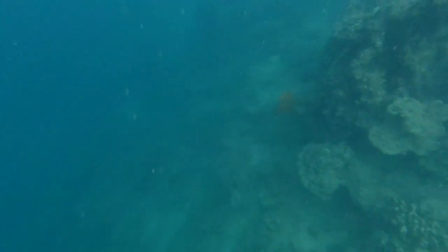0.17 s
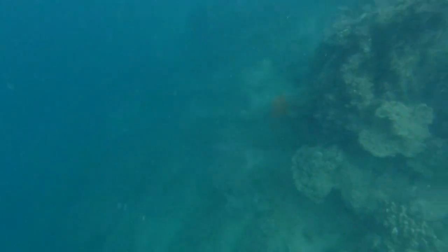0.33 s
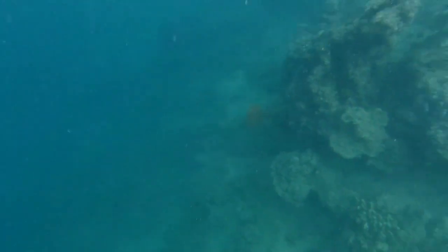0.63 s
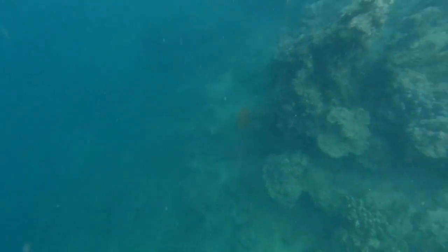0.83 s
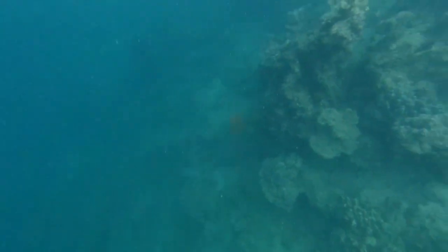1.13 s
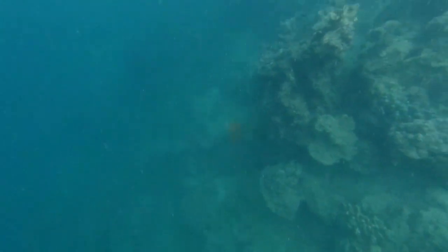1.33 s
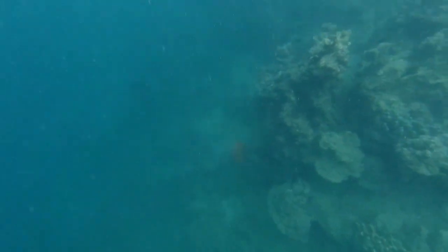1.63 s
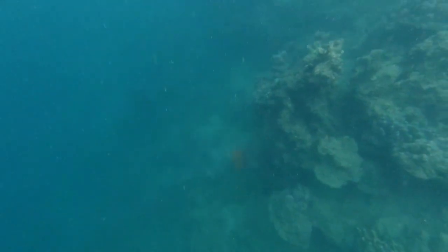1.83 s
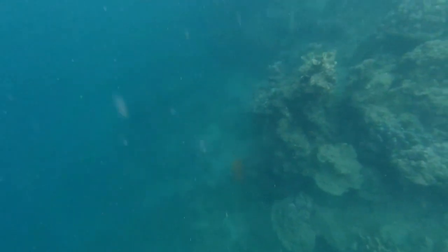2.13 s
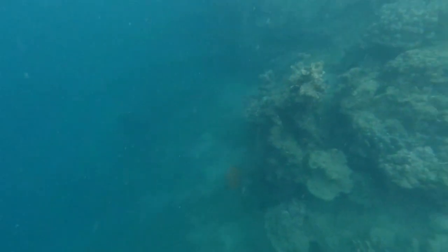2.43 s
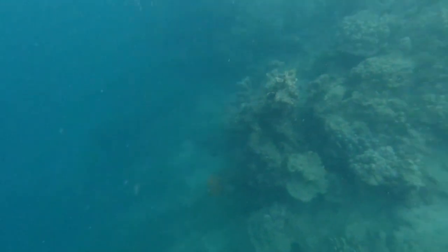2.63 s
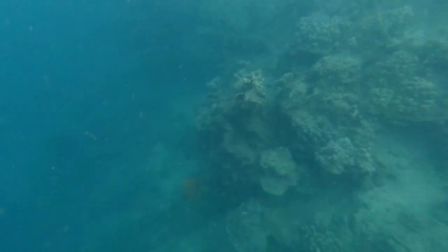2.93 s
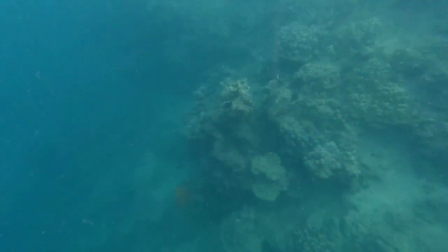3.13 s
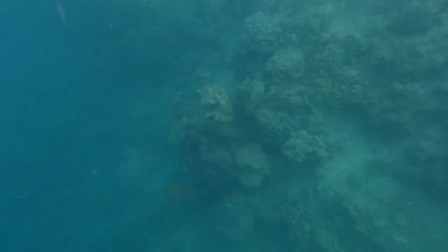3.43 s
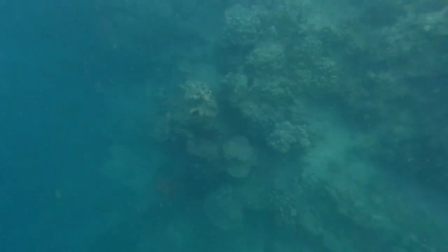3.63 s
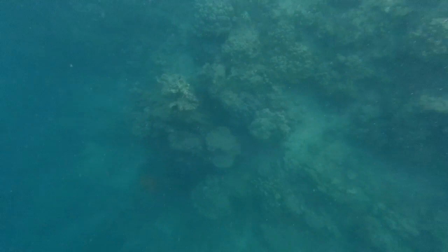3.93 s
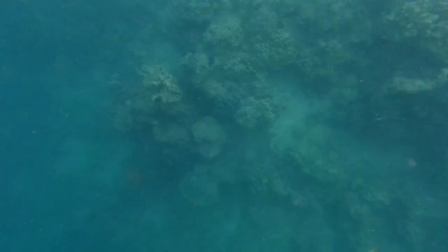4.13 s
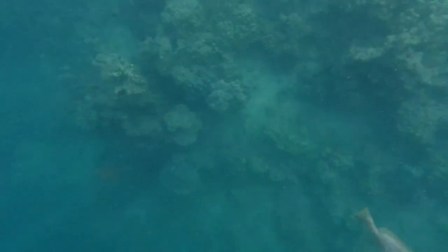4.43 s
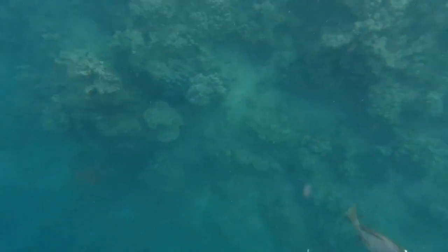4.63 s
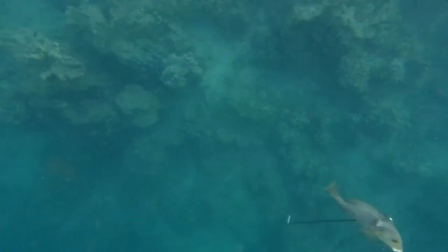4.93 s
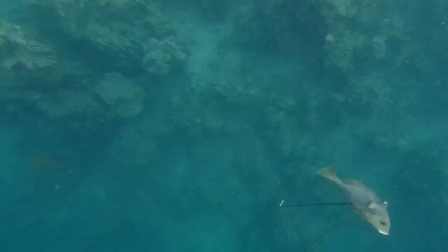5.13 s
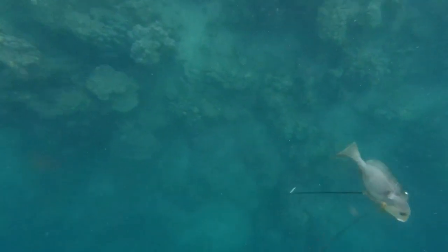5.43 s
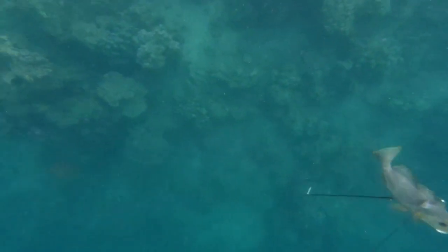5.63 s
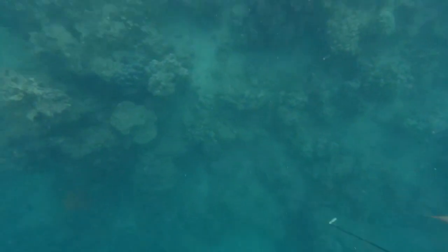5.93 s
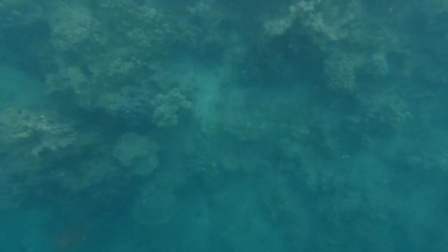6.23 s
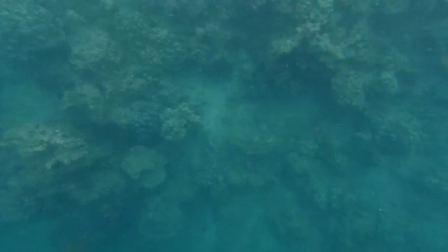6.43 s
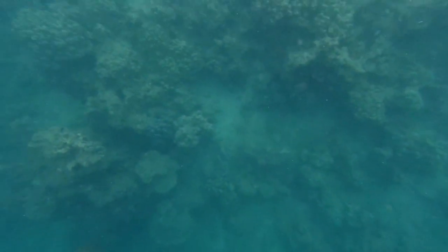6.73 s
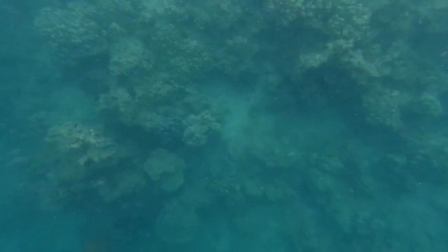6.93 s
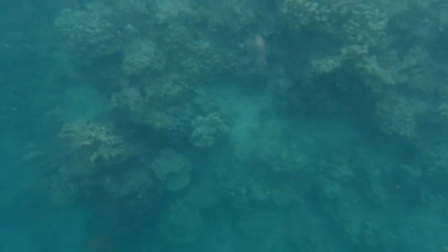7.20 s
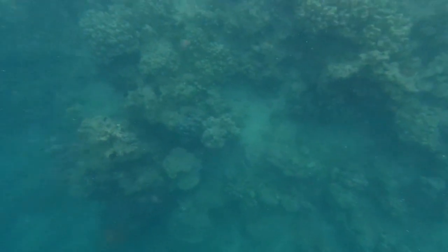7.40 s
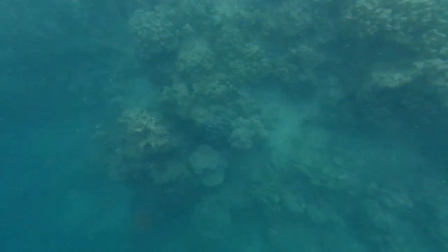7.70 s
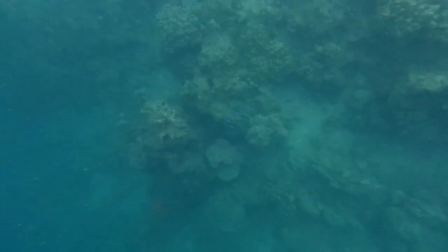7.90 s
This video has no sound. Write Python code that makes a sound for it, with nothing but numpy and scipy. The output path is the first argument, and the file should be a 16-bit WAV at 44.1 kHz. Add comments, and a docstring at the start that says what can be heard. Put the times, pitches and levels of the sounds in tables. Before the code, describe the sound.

Underwater over a reef, heard from inside a sealed camera housing. Snapping shrimp crackle throughout, dry irregular clicks over a fine distant bed. Low water pressure heaves and rubs past as the diver moves, with soft bassy thumps and hollow knocks of the mount. The strongest bump and rattle comes just before seven seconds, then a very short falling rubbery groan near the end.

```python
"""Over a reef, a camera in a sealed housing drifts along with a diver.
Snapping shrimp crackle all around as shaped noise bursts coloured by the housing's resonances.
Water heaves, rubs and hisses as coloured noise; jolts of the mount swing two decaying sines.
Small parts knock as short chatters and noise puffs, and near the end something rubbery judders
once in a short falling groan of wavering overtones."""
import sys
import numpy as np
from scipy.fft import rfft, irfft, next_fast_len
from scipy.io import wavfile
from scipy.ndimage import map_coordinates

SR = 44100
rng = np.random.default_rng(int(sys.argv[2]) if len(sys.argv) > 2 else 0)


def put_to_file(sound):
    """Save the sound as 16-bit audio at rate SR, in the file named by the first command-line argument."""
    columns = np.atleast_2d(sound).T  # one column per channel
    safe = np.clip(columns, -1, 1)
    whole_steps = np.round(safe * 32767)
    wavfile.write(sys.argv[1], SR, whole_steps.astype(np.int16))


N = 355446  # length in samples

# Near shrimp. Each row: time in seconds, peak in dB of the low ring, of the middle ring, of the treble spit.
NEAR_SNAPS = [(0.057, -38, -35, -48), (0.0963, -52, -51, -31), (0.13, -28.5, -35, -56),
              (0.157, -43, -37, -34), (0.2438, -31, -35, -28), (0.255, -29, -38, -31),
              (0.322, -17, -28.5, -24.5), (0.401, -25, -33, -27), (0.42, -24, -26.5, -28.5),
              (0.461, -30.5, -42, -37), (0.546, -26, -33.5, -34), (0.88, -29, -45, -34),
              (1.0013, -21, -29.5, -33), (1.134, -29.5, -50, -51), (1.256, -29, -53, -52),
              (1.316, -30.5, -32.5, -35), (1.4345, -32, -43, -43), (1.6047, -55, -38, -34),
              (1.802, -37, -49, -31), (1.8123, -22.5, -31.5, -39), (1.869, -35, -35, -34),
              (1.894, -27, -32.5, -32.5), (1.9638, -26, -39, -41), (1.986, -30, -29, -27.5),
              (2.026, -47, -40, -34), (2.056, -30, -28, -27.5), (2.187, -57, -45, -31),
              (2.3966, -30, -32, -35), (2.7016, -28, -30, -31), (2.775, -28.5, -30, -34),
              (2.7823, -22, -31, -32), (2.807, -30.5, -36, -35), (2.9226, -28, -58, -59),
              (2.961, -28, -31, -36), (3.013, -30.5, -45, -36), (3.0573, -25.5, -50, -36),
              (3.0953, -35, -41, -45), (3.1111, -23, -35, -41), (3.118, -22, -34.5, -42),
              (3.2039, -24.5, -37, -25), (3.26, -35, -33.5, -48), (3.368, -28.5, -24, -26.5),
              (3.425, -31.5, -43, -57), (3.675, -31, -32.5, -49), (3.6911, -23, -34, -38),
              (3.721, -31, -40, -45), (3.76, -23.5, -32, -26.5), (3.79, -30.5, -46, -51),
              (3.831, -29, -34, -37), (3.87, -26.5, -56, -36), (3.933, -50, -59, -31.5),
              (3.976, -32, -31, -42), (4.0647, -39, -35.5, -31.5), (4.152, -27, -32.5, -43),
              (4.231, -31, -54, -46), (4.2867, -40, -30, -35), (4.301, -31, -35, -23.5),
              (4.3659, -36, -35, -34), (4.394, -49, -29, -38), (4.483, -31.5, -31, -42),
              (4.4911, -32, -35, -27.5), (4.502, -33, -33, -33), (4.6573, -24.5, -43, -46),
              (4.9168, -23, -29.5, -38), (5.0323, -32.5, -33, -30), (5.0692, -16.5, -35, -29.5),
              (5.25, -22, -29, -33), (5.3118, -28.5, -34, -33), (5.3193, -28, -39, -39),
              (5.512, -30.5, -34, -39), (5.521, -34, -29, -28), (5.6173, -25.5, -55, -40),
              (5.7082, -30, -32.5, -56), (6.015, -90, -49, -29.5), (6.036, -21.5, -29, -35),
              (6.045, -28, -31, -34), (6.185, -30.5, -35.5, -36), (6.3834, -35, -23, -29),
              (6.397, -39, -38, -28.5), (6.64, -30.5, -32.5, -31.5), (6.764, -34, -34, -34),
              (6.812, -25, -30, -54), (6.829, -34, -30, -24.5), (6.841, -31, -38, -34),
              (6.885, -37, -37, -36), (6.962, -41, -42, -52), (7.0131, -33, -33, -48),
              (7.078, -30.5, -55, -42), (7.119, -33, -51, -37), (7.18, -32, -51, -38),
              (7.282, -38, -44, -54), (7.389, -29.5, -30.5, -31), (7.982, -28, -36, -50)]
# Far shrimp bed. Each row: time in seconds, level in dB.
FAR_CRACKLE = [(0, -48), (1.7, -51), (2.0, -45), (2.25, -52.5), (2.8, -48.5), (4.4, -52), (6.04, -49.5),
               (6.3, -57.5), (6.42, -49.5), (7.85, -50), (8.06, -49.5)]
# Resonances of the housing. Each row: centre in Hz, width in Hz, level in dB.
SHELL_RESONANCES = [(1420, 550, -10), (1850, 354, -4), (2697, 600, -6), (4020, 880, -7.5),
                    (6290, 1150, -9.5), (8780, 2000, -14.5), (12400, 1200, -19), (14600, 1600, -16)]
# Jolts of the mount. Each row: time in seconds, strength in dB.
MOUNT_JOLTS = [(0.178, -21), (0.24, -21), (0.327, -20), (0.528, -29), (0.847, -27), (0.902, -24.5),
               (1.23, -20.5), (1.301, -21.5), (1.729, -26), (1.912, -34), (3.701, -29), (3.754, -22.5),
               (3.86, -27), (4.08, -26), (4.178, -30.5), (4.25, -24.5), (4.351, -25), (4.495, -32),
               (5.015, -30), (5.455, -27), (5.657, -24.5), (6.112, -25), (6.451, -24), (6.6, -26),
               (6.818, -16.5), (6.86, -24), (7.009, -15), (7.081, -25), (7.39, -29), (7.528, -24),
               (7.59, -20), (7.689, -21)]
# Wobble, then slow swing of the mount. Each row: pitch in Hz, 60 dB decay in seconds, level in dB over the jolt.
MOUNT_MODES = [(80.7, 0.19, 3.5), (33.7, 0.25, -4.5)]
# Loose parts. Each row: time in seconds, strength in dB, centre in Hz, upper ring in dB over the strength.
PART_KNOCKS = [(0.302, -29.5, 380, -11), (0.48, -40, 510, -25), (0.726, -42.5, 408, -5),
               (1.131, -36.5, 510, -11), (1.486, -41, 680, -11), (1.598, -38, 490, -31),
               (1.756, -40.5, 620, -3), (2.602, -32, 720, -29), (3.114, -35, 685, -21),
               (4.126, -42, 670, -4), (4.366, -26.5, 745, -1.5), (4.582, -42.5, 636, 5),
               (6.454, -34.5, 594, -22), (6.492, -33, 500, -32), (6.8095, -25, 630, -7.5),
               (6.825, -27, 616, -5), (6.938, -22, 636, -5.5), (6.999, -39, 604, -6), (7.012, -28, 654, -4),
               (7.034, -31, 530, -16), (7.719, -38, 523, -24), (7.862, -38, 516, -19)]
# Low slaps of water on the wall. Each row: start in seconds, peak in dB.
WATER_THUDS = [(1.425, -44), (1.594, -46), (2.078, -42), (2.115, -43), (2.39, -43.5), (2.449, -39.5),
               (2.548, -43), (3.017, -42.5), (3.103, -41), (3.313, -44), (3.64, -44), (4.04, -41),
               (4.491, -43), (4.721, -41), (4.804, -40), (5.828, -46), (6.159, -34.5), (6.38, -39),
               (6.911, -45), (7.405, -34), (7.804, -37.5)]
# Groan. Each entry: mean level in dB of one multiple of the pitch, from the first up.
GROAN_OVERTONES = [8, -6.5, -16, -28, -32]
# The diver moves and water rubs past. Each row: time of full flow in seconds, hold in seconds, flow level in dB.
DIVER_MOVES = [(0.123, 0.45, -61.5), (0.629, 0.37, -55.5), (1.725, 0.38, -63), (3.682, 0.19, -54.5),
               (4.093, 0.35, -55), (5.183, 0.516, -52), (6.453, 0.26, -56.5), (6.752, 0.36, -51),
               (7.388, 0.37, -59.5)]
# Slow pressure heave. Each row: time in seconds, level in dB.
HEAVE_LEVEL = [(0, -37.5), (.3, -31.5), (1.64, -41), (2.2, -39.5), (3.55, -37.5), (3.88, -24), (4.0, -31.5),
               (4.5, -29), (5.52, -27), (6.33, -43), (6.84, -20.5), (7.05, -32), (7.25, -35), (8.06, -32)]
# Colour of the heave. Each row: frequency in Hz, relative level in dB per Hz.
HEAVE_COLOUR = [(4, -14), (12, -5.5), (24, -10), (36, -11.5), (55, -31), (75, -26), (110, -39), (160, -120)]
# Colour of the rub along the housing. Each row: frequency in Hz, relative level in dB per Hz.
RUB_COLOUR = [(82, -83), (140, 4), (193, 2), (284, -13), (355, -2), (502, -13), (656, 0.5), (1100, -25.5),
              (1430, -55), (2420, -120)]
# Colour of the steady sea noise outside the housing. Each row: frequency in Hz, relative level in dB per Hz.
HISS_COLOUR = [(90, -37), (140, -13), (300, -10), (600, 0.5), (1000, 2), (1500, 5), (4000, -1), (16000, 10)]

RIPPLE_DB = 1.5  # each snap comes by its own paths, which dent its colour
TREBLE_LAG_S = .001  # the bubble swells first, then collapses with the spit
CLUSTER_DB, CLUSTER_RATE = 3, 12  # the colony swells and thins: typical depth, changes a second
# The knock that a jolt shakes loose: mean level over the jolt, middle pitch, upper ring, delay
RATTLE_DB, RATTLE_HZ, RATTLE_RING_DB, RATTLE_LAG_S = -17.5, 630, -5.5, 0.00512
KNOCK_CYCLES, KNOCK_PUFF_DB = 6.5, -10  # chatter length; noise puff over the knock's strength
THUD_HZ, THUD_T60_S = 182, 0.0087
GROAN_S, GROAN_GAIN_DB = 7.612, -21  # start; gain over the overtones
GROAN_FROM_HZ, GROAN_TO_HZ, GROAN_SAG_S = 265, 105.2, .02  # the pitch sags from one towards the other
GROAN_RISE_S, GROAN_HOLD_S, GROAN_FALL_S = 0.029, 0.0365, 0.013
GROAN_BODY_HZ, GROAN_BODY_DB = 304, 5.5  # a resonance that lifts the overtones near it
GROAN_SLIP = 20  # slip of each overtone against the one below (radians a second)
MOVE_RISE_S, MOVE_FALL_S, STILL_DB = 0.013, 0.041, -72.5  # flow swells and dies; rub between moves
SWAY_DB, SWAY_STILL_DB = 10, -51.5  # wobble of the mount over the flow; wobble between moves
TICK_DB, TICK_HZ, TICK_T60_S = -1, 487, 0.012  # ticks the flow shakes loose: level over it, middle pitch
DRIFT_DB, DRIFT_HZ = -38, 10.5  # very slow pressure drift that never rests: level, upper edge
HISS_DB = -60
CEILING, TOP_HZ = .52, 15900  # largest swing kept; band limit of the camera


def shrimp(count=2400):
    """Near snaps stand out; many far ones crackle behind them at scattered sizes and colours."""
    when, size, low, middle, treble = rng.random((count, 5)).T
    size_db = -4.2 * np.log(1 - .985 * size)  # mostly small, a few large
    far = snaps(when * (N - 1) / SR, size_db + 17 * low, size_db - 3.5 + 18 * middle,
                size_db + 0.5 + 18 * treble)
    clustered = unit(far * amp(CLUSTER_DB * wobble(CLUSTER_RATE)))
    s, *levels_db = np.transpose(NEAR_SNAPS)
    near = snaps(s - .0012, *levels_db)
    return near + amp(curves(FAR_CRACKLE)[0]) * clustered


def snaps(s, low_db, middle_db, treble_db, size=1024):
    """A collapsing claw bubble thuds, rings the housing's resonances and spits treble of changing colour."""
    hz = np.fft.rfftfreq(size, 1 / SR)
    spread = rng.random((len(s), 7)).T
    path_s = 0.000288 + 0.001222 * spread[4][:, None]
    ripple = RIPPLE_DB * np.cos(2 * np.pi * (hz * path_s + spread[5][:, None]))
    colour = shell(hz) + ripple
    stretch = .5 * 3.56 ** spread[6][:, None]  # some snaps die faster than others

    def part(centre_hz, octaves, t60, peak_db, tail_db):
        return bursts(colour + bump(hz, centre_hz, octaves), t60 * stretch, peak_db,
                      size=size, tail_db=tail_db)

    thud = part(450 * 2.26 ** spread[0], 0.51, 0.0072, low_db - 21.5 + 9 * spread[1], -11.5)
    low = part(1760 * 1.138 ** spread[1], 0.41, 0.0038, low_db, -25.5)
    middle = part(2500 * 1.574 ** spread[2], 0.49, 0.006, middle_db, -18)
    treble = part(5500 * 2.87 ** spread[3], 0.83, 0.0037, treble_db, -25)
    return place(thud + low, s) + place(middle + treble, s + TREBLE_LAG_S)


def shell(hz):
    """Level in dB the housing passes: resonances over a stiff wall, a notch, and a leak in the bass."""
    power = sum(amp(2 * db) / (1 + (2 * (hz - centre) / width) ** 2) ** 1.37
                for centre, width, db in SHELL_RESONANCES)
    notch = 1 - 0.97 / (1 + ((hz - 1680) / 60) ** 2)
    stiff_wall = 1 / (1 + (1300 / (hz + 1)) ** 6)
    bass_leak = amp(-14.5) / (1 + (hz / 800) ** 8)
    return 10 * np.log10(power * notch * stiff_wall + bass_leak)


def jolts():
    """Each jolt starts the wobble and the slow swing, in opposite directions, through a soft contact."""
    s, db = np.transpose(MOUNT_JOLTS)
    t = np.arange(SR // 3) / SR
    contact = (1 - np.exp(-t / 0.0043)) ** 2
    rows = 0
    for k, (hz, t60, mode_db) in enumerate(MOUNT_MODES):
        # The slow swing scatters more in pitch than the wobble
        pitch = hz * (1 + .03 * (1 + 3 * k) * rng.standard_normal((len(s), 1)))
        decay = amp(db[:, None] + mode_db - 60 * t / t60)
        rows = rows + (-1) ** k * decay * np.sin(2 * np.pi * pitch * t) * contact
    return place(rows, s + 0.0025)


def knocks(count=130, size=4096):
    """Loose parts chatter, puff and ring near 1.3 kHz; water thuds low on the wall and slaps at random."""
    hz = np.fft.rfftfreq(size, 1 / SR)
    # Every jolt but the last shakes a knock loose
    scatter = rng.standard_normal((len(MOUNT_JOLTS), 2))
    shaken = [(s + RATTLE_LAG_S, db + RATTLE_DB + 3.0 * a, RATTLE_HZ * 2 ** (0.26 * b), RATTLE_RING_DB)
              for (s, db), (a, b) in zip(MOUNT_JOLTS[:-1], scatter)]
    s, db, centre_hz, ring_db = np.transpose(PART_KNOCKS + shaken)
    puff = bursts(bump(hz, centre_hz, octaves=0.22), 0.014, db + KNOCK_PUFF_DB,
                  size=size, tail_db=3, swell_share=0.13)
    body = puff + chatter(centre_hz, db, ring_db, size=size)
    ring = bursts(bump(hz, np.full(len(s), 1280.), octaves=0.71), 0.0079, db + ring_db,
                  size=size, tail_db=-11, swell_share=0.11)
    when, loud, pitch = rng.random((count, 3)).T
    slaps = bursts(bump(hz, 150 * 3.5 ** pitch, octaves=0.73), 0.013, -56 + 14 * loud,
                   size=size, tail_db=-17.0)
    thud_s, thud_db = np.transpose(WATER_THUDS)
    thuds = bursts(bump(hz, np.full(len(thud_s), THUD_HZ), octaves=0.85), THUD_T60_S, thud_db,
                   size=size, tail_db=-22)
    return place(body + ring, s - .002) + place(thuds, thud_s) + place(slaps, when * (N - 1) / SR)


def chatter(hz, db, octave_db, size):
    """A few peaky cycles: a tone and its octave that swell fast and stop."""
    cycles = np.arange(size) / SR * hz[:, None]
    life = np.clip(cycles / KNOCK_CYCLES, 0, 1)
    octave_gain = amp(np.minimum(octave_db, 0) - 8.5)[:, None]
    wave = np.cos(2 * np.pi * cycles) + octave_gain * np.cos(4 * np.pi * cycles)
    return amp(db)[:, None] * np.sin(np.pi * life ** 0.44) ** 2 * wave


def groan():
    """A stick-slip judder that slows down: a falling tone whose overtones waver in strength and alignment."""
    t = np.maximum(np.arange(N) / SR - GROAN_S, 0)
    hz = GROAN_TO_HZ + (GROAN_FROM_HZ - GROAN_TO_HZ) * np.exp(-t / GROAN_SAG_S)
    phase = 2 * np.pi * np.cumsum((t > 0) * hz * (1 + 0.062 * wobble(110))) / SR
    tone = 0
    for k, level_db in enumerate(GROAN_OVERTONES):
        # Higher overtones waver more
        waver_db = (1.0 + 2 * k) * wobble(120)
        body_db = GROAN_BODY_DB / (1 + (((k + 1) * hz - GROAN_BODY_HZ) / 60) ** 2)
        slip = k * (GROAN_SLIP * (t - .055) + .45 * wobble(70))
        tone = tone + amp(level_db + waver_db + body_db) * np.cos((k + 1) * phase + slip)
    envelope = swell(GROAN_S, GROAN_RISE_S, GROAN_HOLD_S, GROAN_FALL_S)
    return amp(GROAN_GAIN_DB) * np.sqrt(2) * tone * envelope


def water():
    """Slow pressure heave, flow that keeps the mount wobbling and rubs along the housing, and steady hiss."""
    flow = sum(amp(db) * swell(s - MOVE_RISE_S, MOVE_RISE_S, hold_s, MOVE_FALL_S)
               for s, hold_s, db in DIVER_MOVES)
    heave = amp(curves(HEAVE_LEVEL)[0]) * noise(lambda f: along(HEAVE_COLOUR, f), lumpy_db=3.0, rate=10)
    drift = unit(filtered(rng.standard_normal(N), lambda f: f / (1 + (f / DRIFT_HZ) ** 4)))
    swaying = (amp(SWAY_DB) * flow + amp(SWAY_STILL_DB)) * sway()
    rub = (0.83 * flow + amp(STILL_DB)) * noise(lambda f: along(RUB_COLOUR, f), lumpy_db=4.5, rate=45)
    ticking = amp(TICK_DB) * flow * ticks()
    hiss = noise(lambda f: along(HISS_COLOUR, f) + shell(f), lumpy_db=2.2, rate=20)
    return heave + amp(DRIFT_DB) * drift + swaying + rub + ticking + amp(HISS_DB) * hiss


def sway():
    """The wobble of the mount, kept going by uneven random pushes on its resonance, at rms 1."""
    hz, t60, _ = MOUNT_MODES[0]
    width = np.log(1000) / np.pi / t60  # bandwidth in Hz that gives this decay
    push = rng.standard_normal(N) * amp(2.9 * wobble(8.1))
    return unit(filtered(push, lambda f: f * width / (hz * hz - f * f + 1j * f * width)
                         / (1 + (f / 130) ** 4)))


def ticks(count=420, size=1024):
    """Short dull, broad ticks at scattered times, sizes and colours, at rms 1."""
    when, pitch, loud = rng.random((count, 3)).T
    centre_hz = TICK_HZ * 2 ** (1.1 * (pitch - .5))
    colour = bump(np.fft.rfftfreq(size, 1 / SR), centre_hz, octaves=0.65)
    rows = bursts(colour, TICK_T60_S, 16 * loud, size=size, tail_db=-14.5, swell_share=0.077)
    return unit(place(rows, when * (N - 1) / SR))


def amp(db):
    """Gain of a level in dB."""
    return 10 ** (np.asarray(db) / 20)


def unit(x):
    """x at rms 1."""
    return x / np.sqrt(np.mean(x ** 2) + 1e-20)


def along(points, hz):
    """Read (Hz, value) points on a log frequency axis."""
    f, v = np.transpose(points)
    return np.interp(np.log(hz + 1), np.log(f + 1), v)


def curves(rows):
    """One value per sample for each column after the time."""
    s, *cols = np.transpose(rows)
    return [np.interp(np.arange(N) / SR, s, c) for c in cols]


def wobble(rate):
    """A smooth random curve, rate knots a second."""
    knots = rng.standard_normal(int(N * rate / SR) + 4)
    return map_coordinates(knots, [np.arange(N) * rate / SR])


def swell(start_s, rise_s, hold_s, fall_s):
    """Gain that rises to 1, holds and falls back to 0."""
    t = np.arange(N) / SR - start_s
    return np.clip(np.minimum(t / rise_s, (rise_s + hold_s + fall_s - t) / fall_s), 0, 1) ** 2


def filtered(x, response):
    """x shaped by a response of frequency."""
    m = next_fast_len(N + SR // 2)
    return irfft(rfft(x, m) * response(np.fft.rfftfreq(m, 1 / SR)), m)[..., :N]


def noise(colour_db, lumpy_db, rate):
    """Coloured noise of rms 1 whose level moves in lumps."""
    white = rng.standard_normal(N) * amp(lumpy_db * wobble(rate))
    return unit(filtered(white, lambda hz: amp(colour_db(hz))))


def bump(hz, centre_hz, octaves):
    """A bell in dB around each centre, 6 dB down at the given octaves to either side."""
    return np.maximum(-6 * (np.log2((hz + 1) / np.asarray(centre_hz)[:, None]) / octaves) ** 2, -50)


def bursts(colour_db, t60, peak_db, size, tail_db, swell_share=0.16):
    """One coloured noise puff a row, at its own peak: quick swell, decay, longer scattered tail."""
    t = np.arange(size) / SR
    rise = (1 - np.exp(-t / (swell_share * t60))) ** 2
    decay = amp(-60 * t / t60) + amp(tail_db - 60 * t / (6 * t60))
    puff = rng.standard_normal((len(peak_db), size)) * rise * decay
    # Fold the cepstrum forward so that the colour rings only after the puff
    cepstrum = irfft(np.log(amp(colour_db) + 1e-6), size)
    cepstrum[:, 1:size // 2] *= 2
    cepstrum[:, size // 2 + 1:] = 0
    fade = np.cos(np.pi / 2 * t / t[-1])
    rows = irfft(rfft(puff) * np.exp(rfft(cepstrum)), size) * fade
    return rows * (amp(peak_db) / np.abs(rows).max(1))[:, None]


def place(rows, s):
    """Sum the rows into the scene, each from its time."""
    at = np.round(np.asarray(s) * SR).astype(int)[:, None] + np.arange(rows.shape[1])
    return np.bincount(at.ravel(), rows.ravel(), N + SR)[:N]


def scene():
    """Everything reaches one microphone inside the housing."""
    return (shrimp() + water() + jolts() + knocks() + groan())[None]


def record(dry):
    """The loudest swings are rounded off, and the camera keeps nothing above its band limit."""
    rounded = dry / (1 + np.abs(dry / CEILING) ** 6) ** (1 / 6)
    return filtered(rounded, lambda hz: hz < TOP_HZ)


dry = scene()
out = record(dry)
put_to_file(out)
```